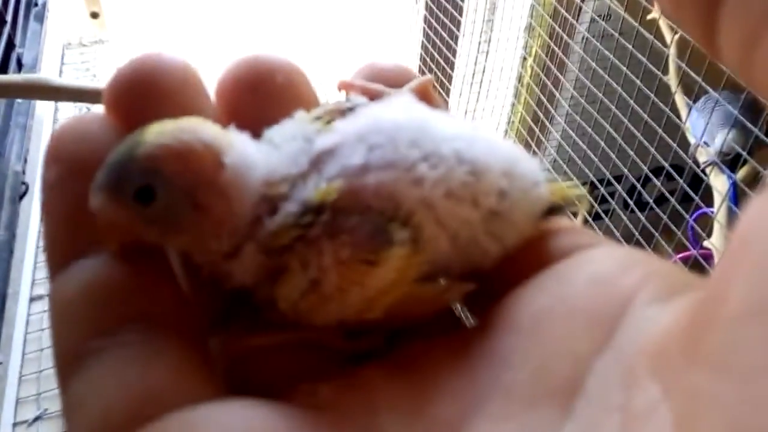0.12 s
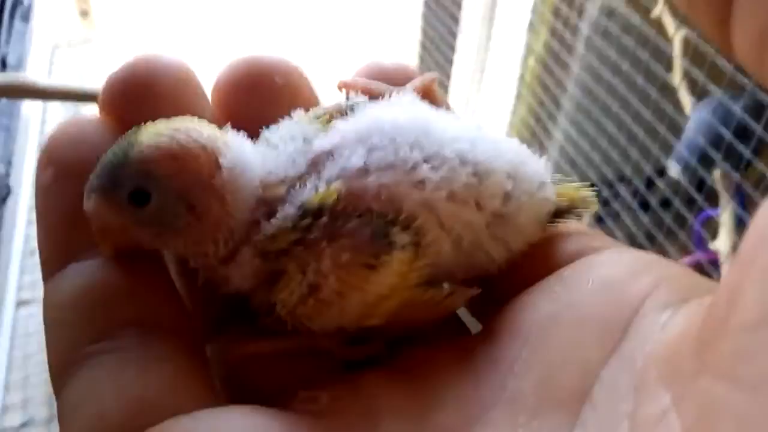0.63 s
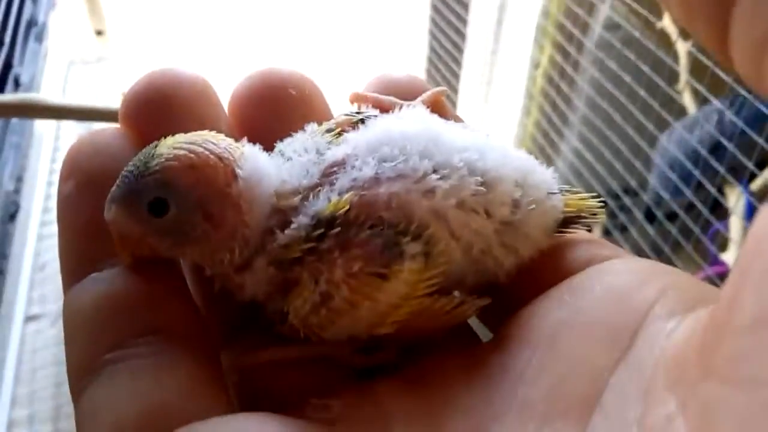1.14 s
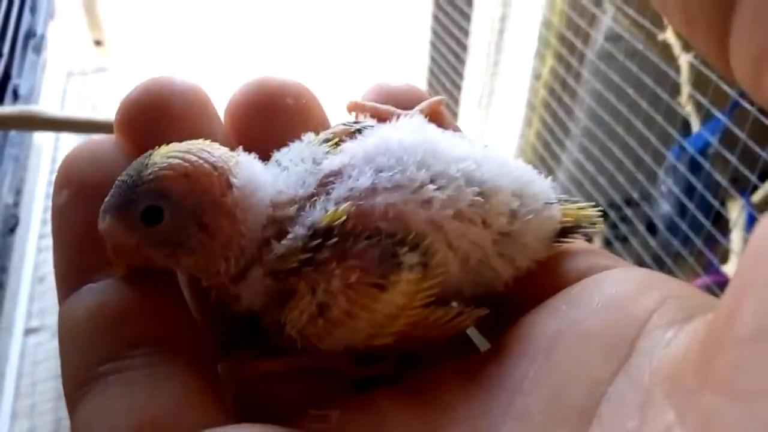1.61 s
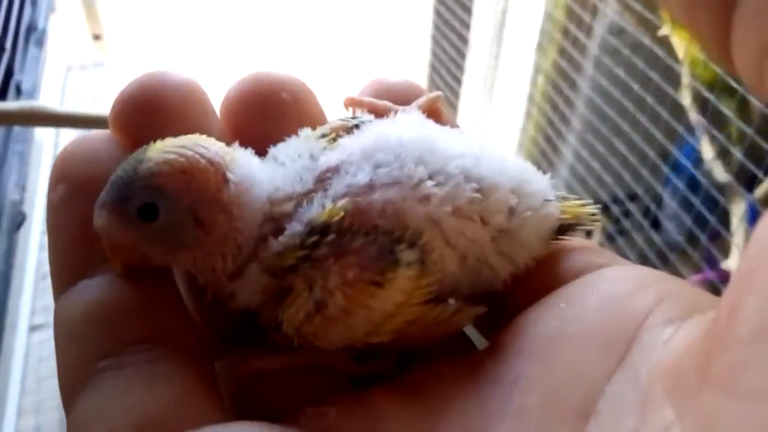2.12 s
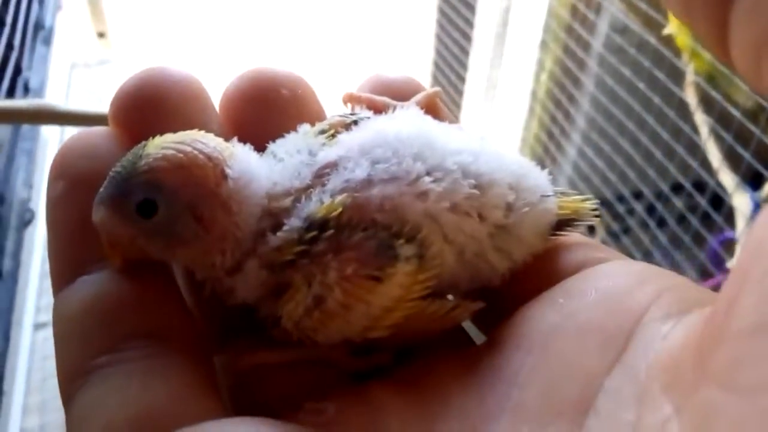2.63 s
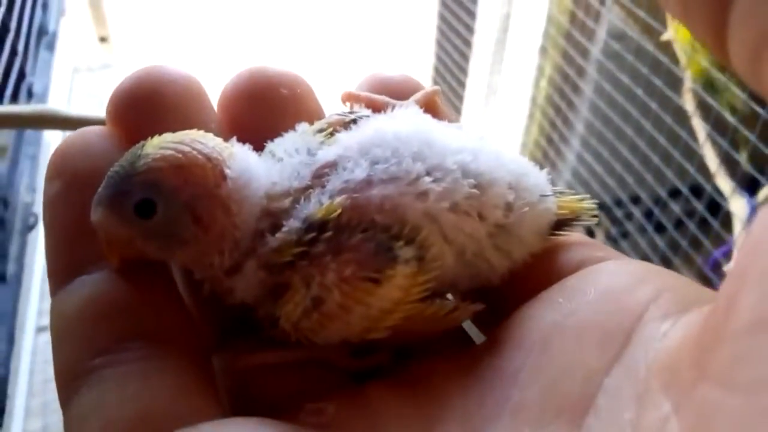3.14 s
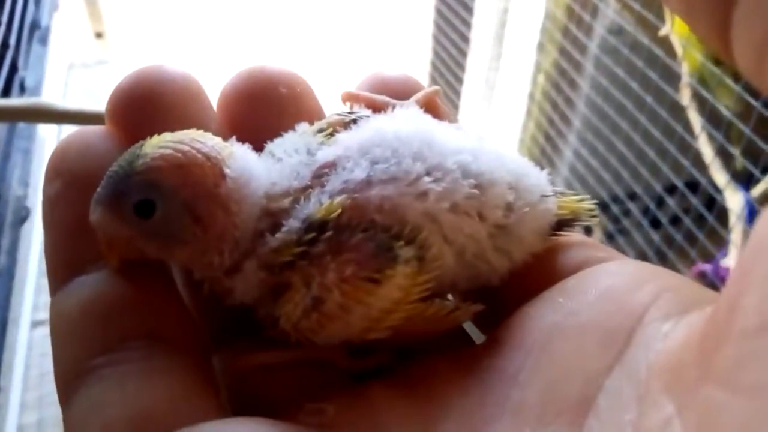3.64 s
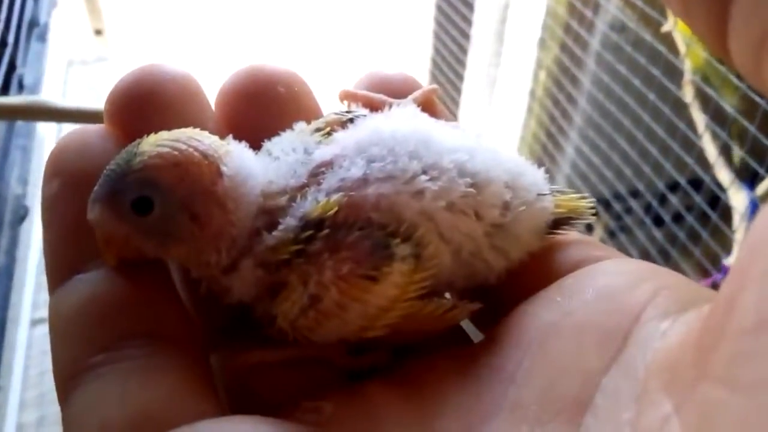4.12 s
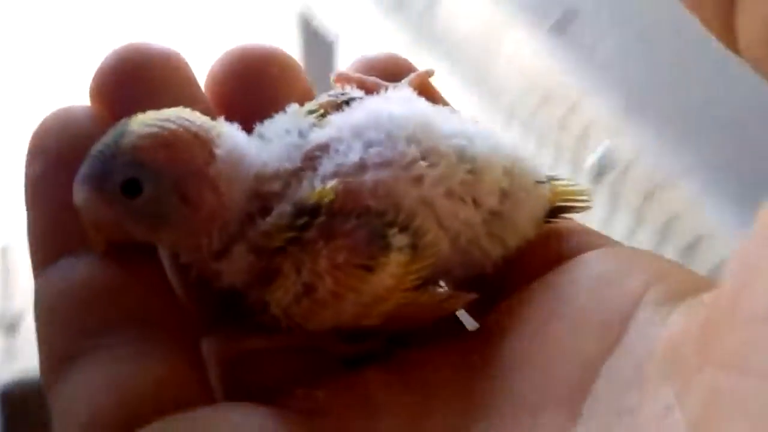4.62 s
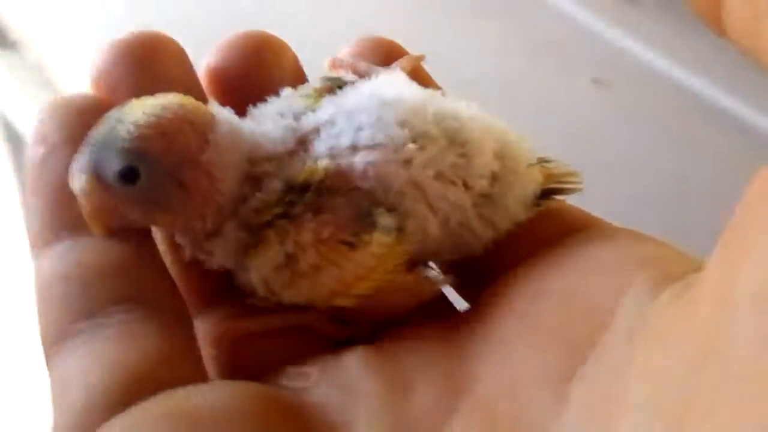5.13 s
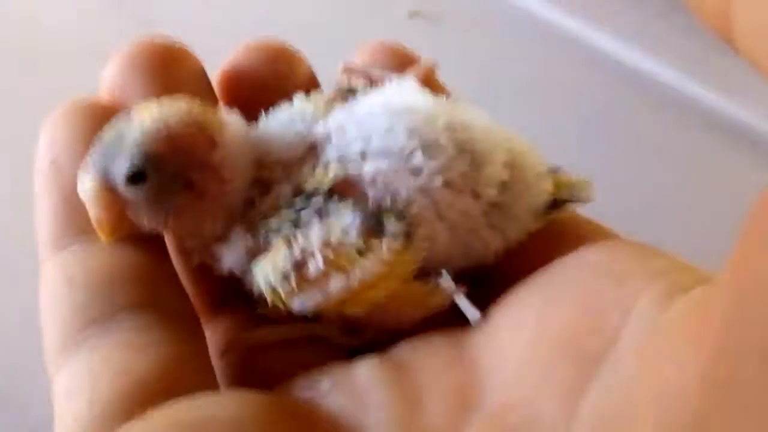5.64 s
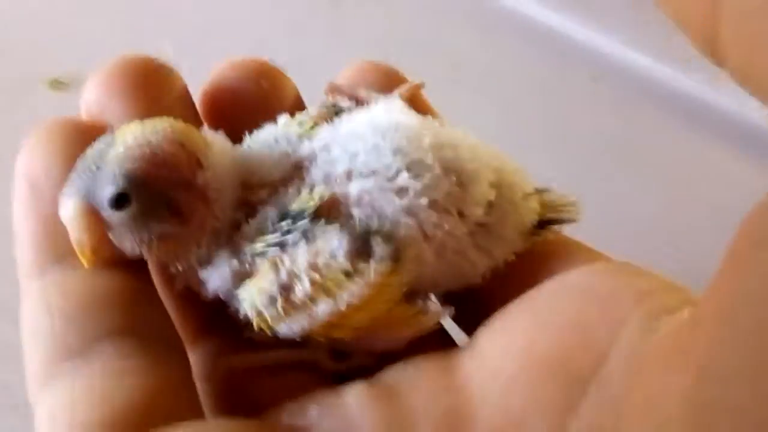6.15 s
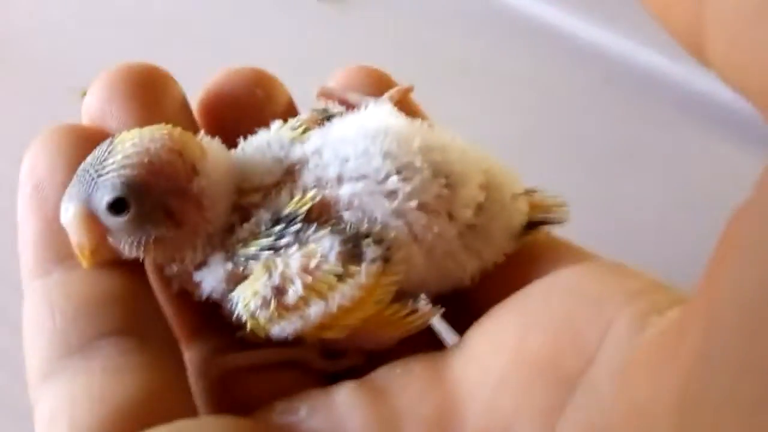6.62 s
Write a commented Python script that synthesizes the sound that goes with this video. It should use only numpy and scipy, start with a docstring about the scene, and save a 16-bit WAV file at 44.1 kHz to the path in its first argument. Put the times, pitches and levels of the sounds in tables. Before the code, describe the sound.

A budgie chick gives a few hoarse rising peeps and quick rough chips while grown budgies whistle, squawk harshly and flutter nearby over faint hum.

```python
"""A budgie chick peeps and chips in a hand beside a wire cage, in a small hard-walled space:
gliding overtone stacks that shiver as the voice roughens. Grown budgies in the cage whistle
(near-pure gliding tones), squawk harshly (irregular pulses through two resonances) and flutter
(shaped noise at the wing-beat rate). Dry ticks, and a quiet outdoor hum of shaped noise."""
import sys
import numpy as np
from scipy import signal
from scipy.fft import rfft, irfft, next_fast_len
from scipy.io import wavfile
from scipy.ndimage import uniform_filter1d

SR = 44100
rng = np.random.default_rng(int(sys.argv[2]) if len(sys.argv) > 2 else 0)


def inscribe(sig):
    """Save sig as 16-bit PCM at rate SR to the path in sys.argv[1].

    A 1-D sig is mono; a 2-D sig holds one channel per row.
    Samples are clipped to [-1, 1] before scaling.
    """
    pcm = np.round(np.clip(np.atleast_2d(sig).T, -1, 1) * 32767)
    wavfile.write(sys.argv[1], SR, pcm.astype(np.int16))


def rack_gain(trim_db):
    """Turn a fader trim in dB into the linear factor to multiply a signal by."""
    fader = np.asarray(trim_db, float)
    return 10 ** (fader / 20)


N = 298116

# Outdoor hum level. Each row: time in seconds, level in dB.
HUM_LEVELS = [(0, -69), (1.5, -69.5), (1.7, -57.5), (2.201, -68), (2.7, -55.5), (3.048, -66.5),
              (3.75, -66.5), (3.969, -61), (4.502, -68.5), (5.0, -66), (5.75, -72.5), (6.76, -65)]
# Hum spectrum. Each row: frequency in Hz, density in dB per Hz.
HUM_SPECTRUM = [(15, -36.5), (25, -21.5), (64, -8), (204, -12), (240, -6.5), (289, -15), (368, -12.5),
                (804, -20), (871, -19.5), (970, -22), (1200, -19.5), (1750, -21.5), (1900, -24),
                (4870, -29.5), (15500, -35.5)]
# Left-right likeness of the hum. Each row: frequency in Hz, likeness from -1 to 1.
HUM_LIKENESS = [(60, 0.75), (240, 0.68), (950, 0.18), (3770, 0.16), (15000, -0.73)]
# Lean of the noise layers. Each row: frequency in Hz, left over right in dB.
NOISE_LEAN = [(60, -7), (240, -1.5), (950, -1.5), (3770, 0.5), (15000, -3.5)]
DRONE_HZ, DRONE_DB = 58.5, -75

# Wing-beat bouts. Each row: start in seconds, length in seconds, thump in dB, feather swish in dB.
WING_BOUTS = [(1.693, 0.56, -56.5, -63), (2.19, 0.18, -88, -89), (2.509, 0.47, -51.5, -69.5),
              (3.243, 0.31, -57, -60.5), (3.745, 0.28, -66, -61.5), (4.138, 0.29, -63, -68),
              (4.754, .3, -91.5, -65.5), (5.502, 0.31, -81, -66), (6.059, 0.081, -59.5, -65),
              (6.384, 0.11, -54, -60)]
# Wing thump spectrum. Each row: frequency in Hz, density in dB per Hz.
THUMP_SPECTRUM = [(15, -33), (25, -3), (43, -16.5), (65, 11.5), (76, 1.5), (135, -24.5), (180, -5.5),
                  (230, -35), (400, -120)]
# Feather swish spectrum. Each row: frequency in Hz, density in dB per Hz.
SWISH_SPECTRUM = [(110, -27), (180, -16), (350, 2.5), (488, -10), (687, -11), (816, -4.5), (949, -15.5),
                  (2000, -22.5), (2600, -50), (4400, -120)]
BEATS_PER_S = 18.7
BOUT_RISE_S, BOUT_FALL_S, BOUT_SAG_DB = 0.05, 0.08, -2

# Dry ticks. Each row: start in seconds, level in dB, push in Hz, crackle re push in dB, left over right in dB.
DRY_TICKS = [(0.607, -53.5, 2460, -7, -8), (1.495, -48, 297, -30, 14), (2.513, -50.5, 4980, -4, -15),
             (2.795, -46, 5000, -1, -11), (5.3, -58, 200, -22, -1.5), (5.6, -53.5, 110, -40, 1.5),
             (6.41, -32, 250, -38, 12), (6.562, -44, 250, -30, 10)]
PUSH_RISE_S = 0.00008

# Squawks. Each row: start in seconds, swell in seconds, length in seconds, effort in dB,
# lower and upper throat resonance in Hz, upper over lower in dB.
SQUAWK_CALLS = [(0.833, 0.011, 0.037, -45, 2893, 5410, -12.5), (1.691, 0.035, 0.03, -25.5, 3070, 4830, 5.5),
                (1.792, 0.032, 0.11, -25.5, 3444, 5360, -8), (1.888, 0.022, 0.11, -32, 3840, 6620, 3),
                (2.059, 0.034, 0.074, -40.5, 3000, 5080, 7.5), (2.215, 0.04, 0.11, -32, 3650, 6800, 3),
                (2.672, 0.031, 0.092, -31, 3350, 5300, -1), (2.833, 0.019, .09, -38.5, 3980, 6220, 6.5),
                (2.994, 0.026, 0.093, -33.5, 4120, 5740, 5), (3.099, 0.017, 0.066, -40.5, 2870, 5360, 2),
                (3.149, 0.032, 0.065, -40, 2920, 5090, 8), (4.846, 0.012, 0.083, -28.5, 3490, 5235, -19.5),
                (6.635, 0.0083, 0.11, -33.5, 3190, 5050, -9)]
# Squawk rasp colour. Each row: frequency in Hz, density in dB per Hz.
RASP_SPECTRUM = [(530, -93), (900, -41), (2310, -16.5), (2540, -6), (3340, -4.5), (4040, -11), (5180, -7),
                 (6120, -30.5), (7230, -14.5), (8650, -15.5), (10700, -13.5), (11600, -20), (15500, -21)]
SQUAWK_FALL_S, SQUAWK_SAG_DB = 0.016, -6
BEAK_OPENING_SHARE = 0.056  # climb of both resonances over a squawk

# Contact whistle of one adult. Each row: time at tempo 1 in seconds, pitch in Hz before the
# pitch factor, relative level in dB.
CONTACT_CURVE = [(0, 4100, -12), (.012, 3540, -3.5), (.017, 3060, 4.5), (.038, 2930, 2.5), (.051, 2670, 3),
                 (.054, 1915, -8), (.07, 1887, -16), (.086, 2602, 5), (.098, 2673, 10.5),
                 (.104, 3175, 13.5), (.12, 3260, -1.5), (.128, 2620, -10.5), (.138, 2210, 5.5),
                 (.152, 1914, -10.5), (.19, 1450, -17), (.235, 970, -31)]
# Its repeats. Each row: start in seconds, level in dB, tempo factor, pitch factor.
CONTACT_REPEATS = [(0.063, -41, 0.99, 0.99), (0.776, -48, 0.96, 1.006), (1.677, -44, 0.97, 1.03),
                   (3.966, -40, 1.049, .99)]
# Gliding notes. Each row: start in seconds, length in seconds, start and end pitch in Hz,
# start and end level in dB.
GLIDING_NOTES = [(0.349, 0.034, 3780, 2480, -42, -42), (0.429, 0.06, 1665, 1300, -66, -67),
                 (1.036, 0.067, 3964, 3310, -40.5, -55), (1.107, 0.053, 2426, 3030, -55.5, -46),
                 (1.157, 0.039, 2730, 2120, -50, -57), (1.223, 0.041, 1860, 1130, -65, -81),
                 (3.963, 0.014, 4520, 4160, -45, -32), (4.561, 0.047, 3165, 2600, -42.5, -57),
                 (4.755, 0.029, 4040, 3754, -29, -19), (4.856, 0.02, 2650, 2336, -34, -33),
                 (4.883, 0.024, 3054, 3460, -28.5, -28), (5.018, 0.12, 3510, 3486, -60, -76),
                 (6.584, 0.03, 2396, 3440, -30, -33), (6.615, 0.039, 3186, 1840, -31, -41.5),
                 (6.628, 0.039, 5490, 2890, -34.5, -35), (6.645, 0.048, 7180, 4360, -44, -38),
                 (6.672, 0.077, 4400, 4180, -35, -36)]
NOTE_RISE_S, NOTE_FALL_S = 0.004, 0.005
NOTE_EASE = 1.25  # glide slows towards its end
# Whistles that bend up and down, a list of rows for each. Each row: time in seconds, pitch in Hz,
# level in dB.
WARBLE_CURVES = [
    [(1.096, 3970, -24.5), (1.106, 3430, -50), (1.118, 3230, -46), (1.132, 3250, -36), (1.142, 3404, -33),
     (1.151, 3540, -36), (1.165, 3290, -64), (1.19, 3270, -66)],
    [(4.635, 2306, -53.5), (4.648, 2915, -46), (4.667, 3570, -41), (4.7, 2560, -44), (4.714, 2107, -38.5),
     (4.735, 1850, -54)],
    [(4.79, 3397, -30.5), (4.81, 3170, -28.5), (4.825, 3347, -24.5), (4.853, 3257, -22.5)],
]

# Chick's chips. Each row: start in seconds, level in dB, end pitch in Hz, rise as a share of it,
# length in seconds, roughness (0 is clear).
CHICK_CHIPS = [(0.828, -46, 1700, 0.028, .025, 0.7), (1.094, -40.5, 1699, -0.078, .02, 0.4),
               (4.433, -39.5, 1393, 0.024, 0.0084, .9), (4.487, -46, 1538, 0.16, 0.01288, 1.11),
               (4.559, -44, 1620, 0.19, 0.019, 0.76), (4.621, -47, 1257, 0.28, 0.017, 0.6),
               (4.676, -36.5, 1461, -0.22, 0.014, 0), (4.742, -48, 1397, -0.077, 0.0098, 1.2),
               (4.797, -39.5, 1603, 0.31, 0.017, 0.6), (4.85, -33, 1632, 0.11, 0.018, 0),
               (4.934, -43, 1706, -0.087, 0.011, 0.2), (4.991, -35, 1775, .02, .026, .14),
               (5.101, -48.5, 1427, 0.17, 0.0115, 0.49), (5.511, -41, 1510, 0.27, .026, 0.27)]
# Chip overtones, in order. Each row: multiple of the pitch, level in dB.
CHIP_HARMONICS = [(1, -10), (2, 0), (3, -9), (4, -22), (5, -24), (6, -22), (7, -22), (8, -30)]

# Chick's long peeps. Each row: start in seconds, length in seconds, start and target pitch in Hz,
# share of the length spent gliding there, effort in dB.
CHICK_PEEPS = [(.285, 0.21, 1431, 2238, 0.89, -37.5), (2.171, .245, 1523, 2216, 0.71, -34),
               (3.5, .23, 1612, 2043, 0.69, -34.5), (6.484, 0.16, 1510, 1324, 0.49, -47.5)]
# Chick's throat colour. Each row: frequency in Hz, gain in dB.
THROAT_GAIN = [(1350, -12), (1700, -20), (2150, 0.5), (2900, 3), (3600, -4), (4300, -10), (5200, -12.5),
               (5800, -23.5), (6300, -34), (8500, -38), (11500, -16.5), (14500, -20)]
PEEP_RISE_S, PEEP_FALL_S, PEEP_SAG_DB = 0.018, 0.056, -0.5
PEEP_EASE, PEEP_DROOP_SHARE = 1.6, 0.036  # glide eases into the target, then droops
PEEP_ROLL_DB = 3  # loss per overtone past the second
PEEP_CLEAR, PEEP_STRAIN = 0.3, 0.9  # roughness at the target, and added per share of pitch away

# Reverberation. Each row: frequency in Hz, t60 in seconds.
ROOM_DECAY = [(1000, 0.13), (2000, 0.22), (4000, 0.21), (8000, 0.23), (15000, 0.053)]
# Microphone response. Each row: frequency in Hz, gain in dB, left over right in dB.
MICROPHONE_RESPONSE = [(25, -35.5, -4.5), (45.6, -5, -11.5), (69.5, -1.5, 1.5), (1000, 2.34, 0.9),
                       (7090, 3, 2.5), (8000, -6.5, -2), (9900, -4.5, -5), (15100, -11.5, -13)]


def evened(x):
    """Scaled to unit rms."""
    return x / np.sqrt(np.mean(x ** 2) + 1e-20)


def read(points, hz):
    """A table over frequency, joined on a log axis."""
    f, value = np.transpose(points)
    return np.interp(np.log(hz + 1), np.log(f + 1), value)


def add(mix, start_s, sound):
    """Mixes a sound in at start_s."""
    part = mix[round(start_s * SR):][:len(sound)]
    part += sound[:len(part)]


def unroll(rows):
    """Start time and every column, one value per sample."""
    s, *columns = np.transpose(rows)
    t = np.arange(s[0], s[-1], 1 / SR)
    return s[0], *(np.interp(t, s, c) for c in columns)


def wobble(count, cutoff_hz):
    """Random drift of unit rms: white noise low-passed at cutoff_hz."""
    sos = signal.butter(3, cutoff_hz, fs=SR, output="sos")
    drift = signal.sosfilt(sos, rng.standard_normal(count + 1000))
    return evened(drift[1000:])  # settled part


def effort(length_s, rise_s, fall_s, sag_db):
    """Progress 0-1 through a sound and its level in dB: swell, tilted hold, release."""
    t = np.arange(0, length_s, 1 / SR)
    edge = np.clip(np.minimum(t / rise_s, (length_s - t) / fall_s), 1e-3, 1)
    return t / length_s, 40 * np.log10(edge) + sag_db * t / length_s


def resonate(x, hz, width_hz):
    """Moving resonance: shifts hz down to zero, smooths, shifts back."""
    turn = np.exp(2j * np.pi * np.cumsum(hz * np.ones(len(x))) / SR)
    r = np.exp(-np.pi * width_hz / SR)
    return 2 * (turn * signal.lfilter([1 - r], [1, -r], x / turn)).real


def noise(spectrum, likeness, patchy_db):
    """Two partly alike channels of shaped noise with drifting patches and a left-right lean."""
    frames, hz = N // 512 + 5, np.fft.rfftfreq(2048, 1 / SR)
    a, b, c, d, patches = rng.standard_normal((frames, 1025, 5)).T
    patches = uniform_filter1d(patches, size=20, axis=0)
    patches = evened(uniform_filter1d(patches, size=6, axis=1))
    same = np.clip(read(likeness, hz), -1, 1)[:, None]
    left = a + 1j * b
    right = same * left + np.sqrt(1 - same ** 2) * (c + 1j * d)
    z = np.array([left, right])
    z *= rack_gain(read(spectrum, hz)[:, None] + patchy_db * patches)
    z *= rack_gain(np.outer([0.5, -0.5], read(NOISE_LEAN, hz)))[:, :, None]
    return evened(signal.istft(z, nperseg=2048, noverlap=1536)[1][:, :N])


def placed(x, pan_db, lag_samples, wet_db):
    """Direct sound with a left-right lean and delay, plus sparse reflections dying by band."""
    taps = np.zeros((2, SR // 2))
    at = np.arange(160, SR // 2 - 20, 20) + rng.integers(0, 20, (2, (SR // 2 - 161) // 20))
    np.put_along_axis(taps, at, rng.choice([-1., 1.], at.shape), 1)
    hz, t, z = signal.stft(taps, SR, nperseg=256)
    decay = rack_gain(-60 * t / read(ROOM_DECAY, hz)[:, None])
    response = signal.istft(z * decay, SR, nperseg=256)[1]
    response *= rack_gain(wet_db) / np.linalg.norm(response[0])
    for side in response:  # strong echoes off the nearest walls
        side[rng.integers(90, 1300, size=6)] += 0.16 * rng.choice([-1., 1.], size=6)
    response[0, max(round(lag_samples), 0)] += rack_gain(pan_db / 2)
    response[1, max(-round(lag_samples), 0)] += rack_gain(-pan_db / 2)
    return signal.oaconvolve(x[None], response, axes=1)[:, :N]


def hum():
    """Distant outdoor wash of shaped noise, swelling and sinking, over a wavering low drone."""
    level_db = np.interp(np.arange(N) / SR, *np.transpose(HUM_LEVELS))
    wash = rack_gain(level_db) * noise(HUM_SPECTRUM, HUM_LIKENESS, patchy_db=2.2)
    drone = resonate(rng.standard_normal(N), DRONE_HZ, 12)
    drone = resonate(drone, DRONE_HZ, 12)
    return wash + rack_gain(DRONE_DB) * evened(drone)


def ticks():
    """Single dry clicks and knocks: a push of air and a short crackle."""
    out, t = np.zeros((2, N)), np.arange(600) / SR
    for start_s, level_db, push_hz, crackle_db, pan_db in DRY_TICKS:
        u = 2 * np.pi * push_hz * t
        push = np.minimum(t / PUSH_RISE_S, 1) * (1 - u) * np.exp(-u)
        crackle = rack_gain(crackle_db) * np.exp(-t / 0.0012) * rng.standard_normal(len(t))
        for side, sign in zip(out, (0.5, -0.5)):
            add(side, start_s, rack_gain(level_db + sign * pan_db) * (push + crackle))
    return out


def wings():
    """Each downstroke pushes a low thump and a swish of feathers."""
    thumps, swishes = np.zeros((2, N))
    for start_s, length_s, thump_db, swish_db in WING_BOUTS:
        level_db = effort(length_s, BOUT_RISE_S, BOUT_FALL_S, BOUT_SAG_DB)[1]
        add(thumps, start_s, rack_gain(thump_db + level_db))
        add(swishes, start_s, rack_gain(swish_db + level_db))
    stroke = 0.5 + 0.5 * np.cos(2 * np.pi * BEATS_PER_S * (np.arange(N) / SR - 2.56))
    thump = noise(THUMP_SPECTRUM, [(30, 0.9), (300, 0.26)], patchy_db=-0.5)
    thump = thump * evened(0.3 + stroke ** 0.86)
    swish = noise(SWISH_SPECTRUM, [(200, 0.97), (700, 0.31), (1500, 0.062)], patchy_db=4.1)
    swish = swish * evened(0.76 + stroke)
    return thumps * thump + swishes * swish


def squawk(start_s, swell_s, length_s, effort_db, low_hz, high_hz, tilt_db):
    """Chaotic syrinx pulses, fluttering in bursts, ring two throat resonances over a broad rasp."""
    u, level_db = effort(length_s, swell_s, SQUAWK_FALL_S, SQUAWK_SAG_DB)
    count = len(u)
    turns = np.cumsum(1300 * np.exp(0.18 * wobble(count, 300))) / SR
    pulses = np.diff(np.floor(turns), prepend=0) * rack_gain(1.5 * rng.standard_normal(count))
    drive = evened(pulses - pulses.mean()) + 0.5 * rng.standard_normal(count)
    drive *= rack_gain(3.5 * np.tanh(wobble(count, 220)) + 1.5 * wobble(count, 45))

    drift = 1 + BEAK_OPENING_SHARE * (u - 0.5) + 0.065 * wobble(count, 55)
    low = resonate(resonate(drive, low_hz * drift, 750), low_hz * drift, 750)
    high = resonate(resonate(drive, high_hz * drift, 1300), high_hz * drift, 1300)
    beak = signal.butter(3, [2000, 7500], "bandpass", fs=SR, output="sos")
    rings = signal.sosfilt(beak, 0.86 * evened(low) - rack_gain(tilt_db) * evened(high))

    colour = np.fft.irfft(rack_gain(read(RASP_SPECTRUM, np.fft.rfftfreq(256, 1 / SR))))
    rasp = np.convolve(drive, np.roll(colour, 128) * np.hanning(256), "same")
    voice = rings + 0.65 * rack_gain(0.98 * tilt_db) * evened(rasp)
    return start_s, rack_gain(effort_db + level_db) * voice


def whistle(hz, level_db):
    """A near-pure syrinx tone with faint overtones, trembling in pitch and level."""
    turns = 2 * np.pi * np.cumsum(hz * (1 + 0.012 * wobble(len(hz), 250))) / SR
    tone = np.sin(turns) + rack_gain(-33) * np.sin(2 * turns) + rack_gain(-40) * np.sin(3 * turns)
    tremble_db = 4.8 * np.tanh(wobble(len(hz), 90))
    return np.sqrt(2) * rack_gain(level_db + tremble_db) * tone * signal.windows.tukey(len(hz), 0.06)


def note(start_s, length_s, start_hz, end_hz, start_db, end_db):
    """One whistled glide."""
    u, level_db = effort(length_s, NOTE_RISE_S, NOTE_FALL_S, end_db - start_db)
    hz = end_hz + (start_hz - end_hz) * (1 - u) ** NOTE_EASE
    return start_s, whistle(hz, start_db + level_db)


def warble(rows):
    """One bending whistle along drawn pitch and level curves."""
    start_s, hz, level_db = unroll(rows)
    return start_s, whistle(hz, level_db)


def contact(start_s, repeat_db, tempo, pitch):
    """One contact call: the same whistle curve, stepped through at its own tempo and pitch."""
    _, hz, level_db = unroll(CONTACT_CURVE)
    at = np.arange(0, len(hz) - 1, tempo).astype(int)
    return start_s, whistle(pitch * hz[at], repeat_db + level_db[at])


def stack(hz, levels_db, rough):
    """Overtones of a pitch that shivers and flutters more as the voice roughens."""
    shiver = 0.07 * wobble(len(hz), 120) + 0.04 * wobble(len(hz), 500)
    turns = np.cumsum(hz * (1 + rough * shiver)) / SR
    tone = 0
    for k, db in enumerate(levels_db, 1):
        audible = k * hz < SR / 2.6
        tone = tone + rack_gain(db) * np.cos(2 * np.pi * k * turns) * audible
    return np.sqrt(2) * tone * (1 + 0.7 * rough * wobble(len(hz), 250))


def chip(start_s, level_db, end_hz, rise, length_s, rough):
    """A quick flick of the chick's voice; roughness adds a smack of noise."""
    u = np.linspace(0, 1, round(length_s * SR))
    hz = end_hz * (1 - rise * (1 - u) ** 2)
    voice = stack(hz, [db for _, db in CHIP_HARMONICS], np.clip(rough, 0, 1))
    smack = 2.3 * rough ** 2 * resonate(rng.standard_normal(len(u)), 3100, 1600)
    return start_s, rack_gain(level_db) * (voice + smack) * signal.windows.tukey(len(u), 0.25) / 2


def peep(start_s, length_s, start_hz, target_hz, glide, effort_db):
    """Overtones slide under the throat's fixed colour, hoarser the further from the target pitch."""
    u, level_db = effort(length_s, PEEP_RISE_S, PEEP_FALL_S, PEEP_SAG_DB)
    left = np.clip(1 - u / glide, 0, 1)
    past = np.clip((u - glide) / (1 - glide), 0, 1)
    hz = target_hz * (1 - PEEP_DROOP_SHARE * past ** 2) + (start_hz - target_hz) * left ** PEEP_EASE
    levels_db = [effort_db + level_db + read(THROAT_GAIN, k * hz) - PEEP_ROLL_DB * max(k - 2, 0)
                 for k in range(1, 8)]
    return start_s, stack(hz, levels_db, PEEP_CLEAR + PEEP_STRAIN * abs(1 - hz / target_hz))


def scene():
    """Each voice sounds from its own spot, the chips nearest and driest."""
    scolder, others, caller, chipper, chick = np.zeros((5, N))
    for rows in WARBLE_CURVES:
        add(others, *warble(rows))
    for mix, voice, rows in ((scolder, squawk, SQUAWK_CALLS), (others, note, GLIDING_NOTES),
                             (caller, contact, CONTACT_REPEATS), (chipper, chip, CHICK_CHIPS),
                             (chick, peep, CHICK_PEEPS)):
        for row in rows:
            add(mix, *voice(*row))
    birds = placed(scolder, pan_db=3, lag_samples=7, wet_db=-2)
    birds += placed(others, pan_db=1, lag_samples=6, wet_db=-10)
    birds += placed(caller, pan_db=-1, lag_samples=4, wet_db=-8)
    birds += placed(chipper, pan_db=-2, lag_samples=-6, wet_db=-11)
    birds += placed(chick, pan_db=1, lag_samples=-6, wet_db=-4)
    return hum() + ticks() + wings() + birds


def top_cut(x):
    """Nothing passes above the cut-off."""
    return signal.sosfilt(signal.butter(12, 15660, fs=SR, output="sos"), x)


def record(dry):
    """Each microphone loses deep bass and dips above 8 kHz."""
    f, db, lean_db = np.transpose(MICROPHONE_RESPONSE)
    size = next_fast_len(N)
    log_hz = np.log(np.fft.rfftfreq(size, 1 / SR) + 1)
    gains = [rack_gain(np.interp(log_hz, np.log(f), db + sign * lean_db)) for sign in (0.5, -0.5)]
    heard = irfft(rfft(dry, size) * gains, size)[:, :N]
    return top_cut(heard)


dry = scene()
out = record(dry)
inscribe(out)
```